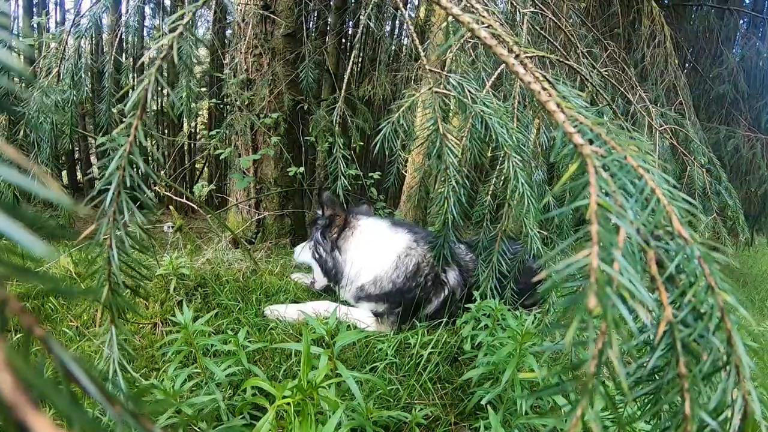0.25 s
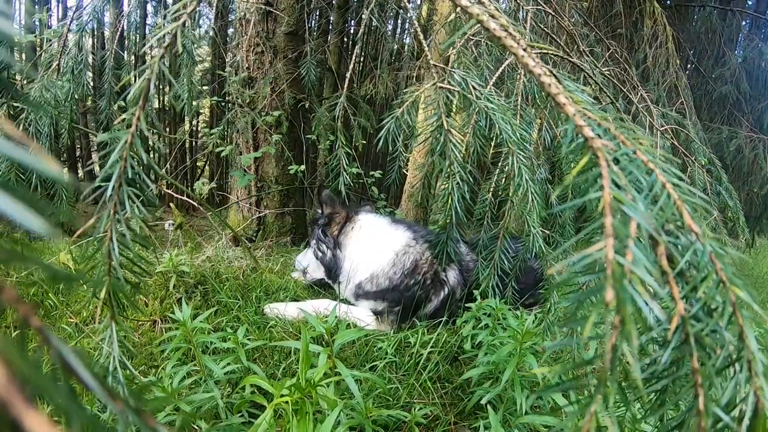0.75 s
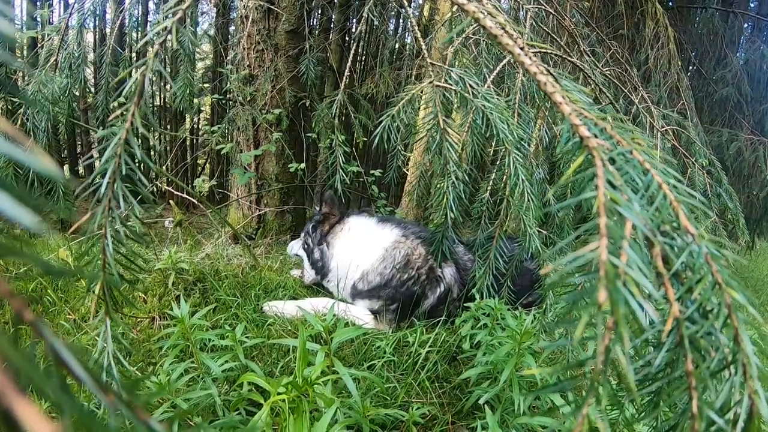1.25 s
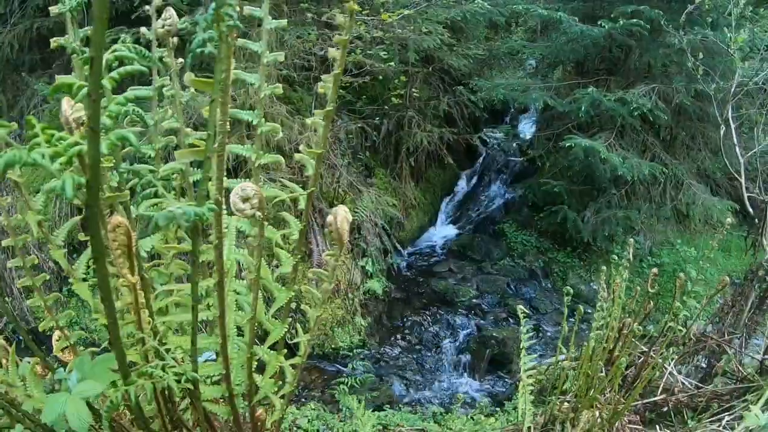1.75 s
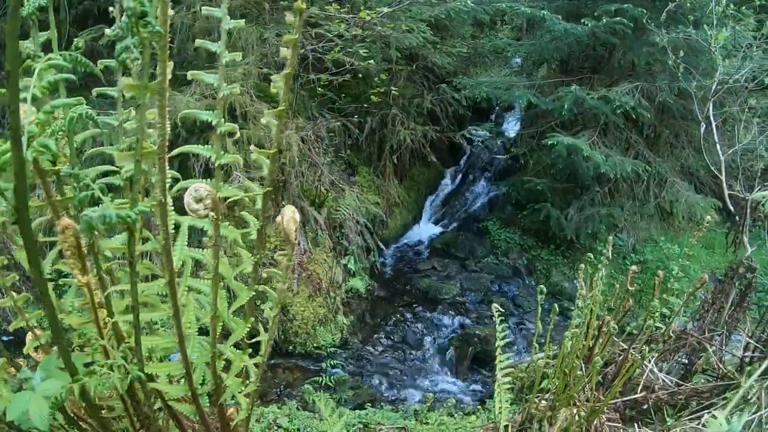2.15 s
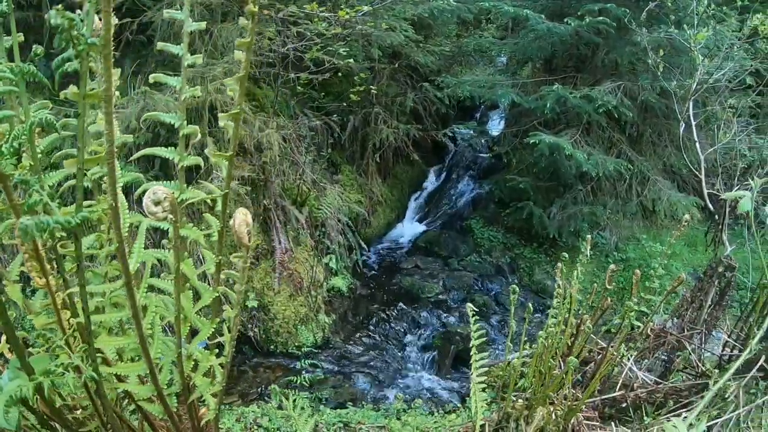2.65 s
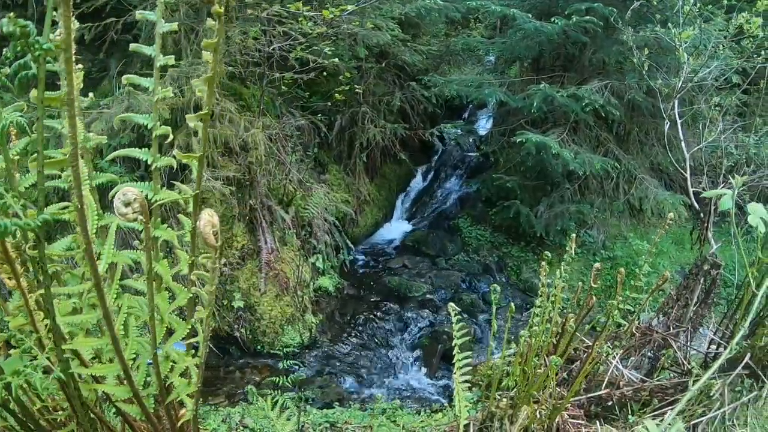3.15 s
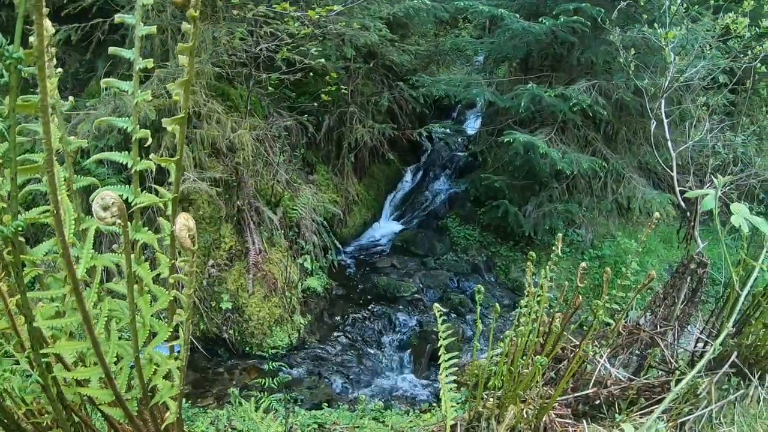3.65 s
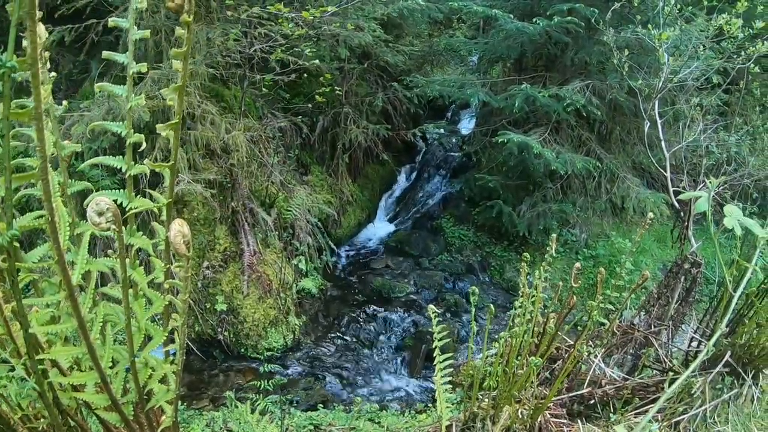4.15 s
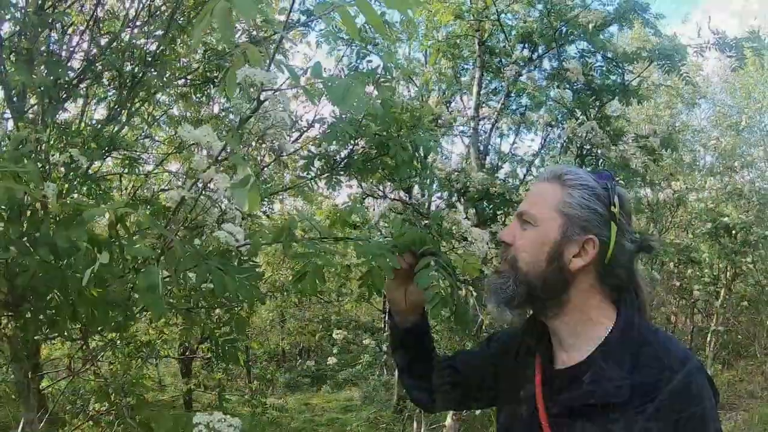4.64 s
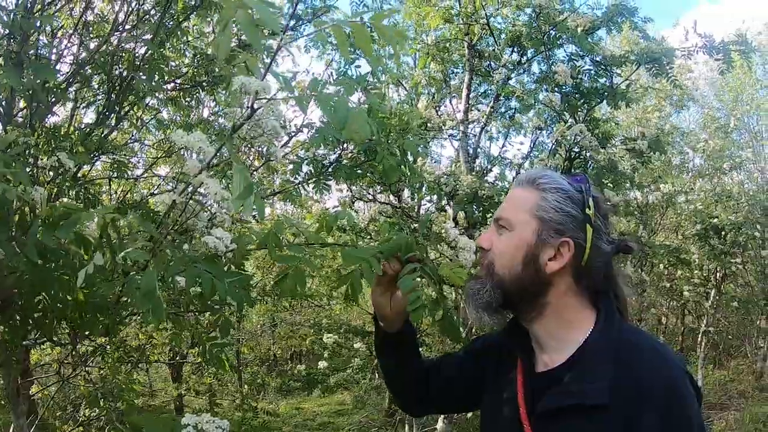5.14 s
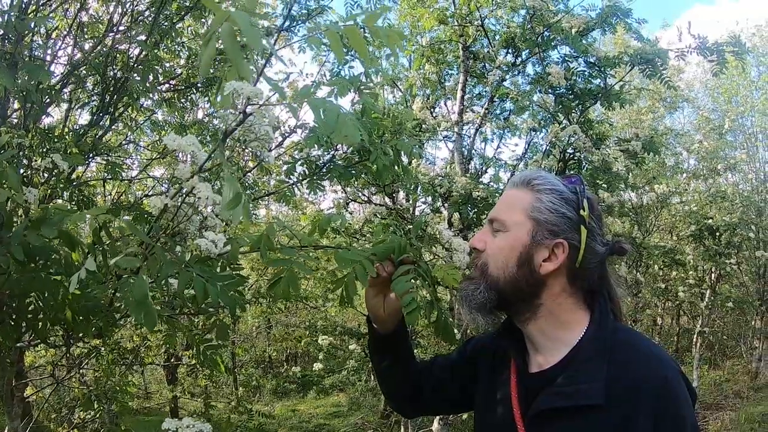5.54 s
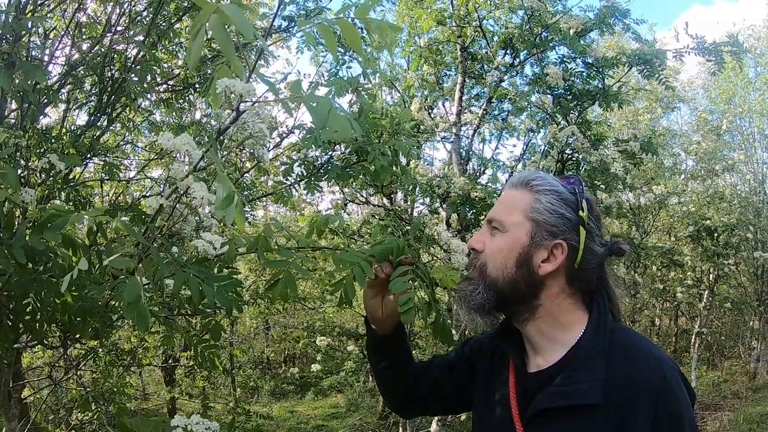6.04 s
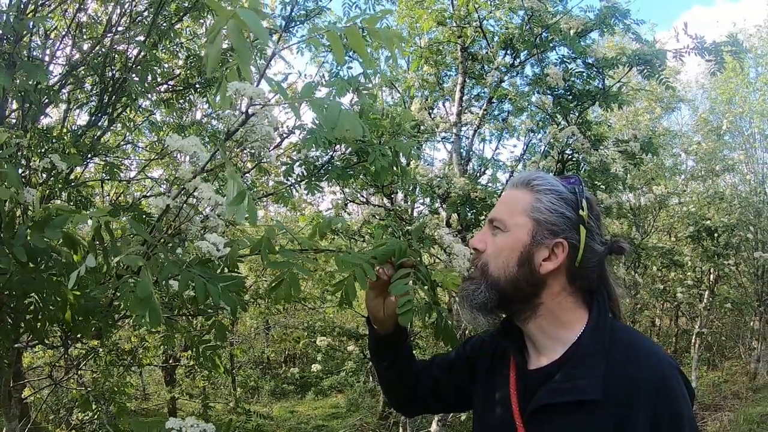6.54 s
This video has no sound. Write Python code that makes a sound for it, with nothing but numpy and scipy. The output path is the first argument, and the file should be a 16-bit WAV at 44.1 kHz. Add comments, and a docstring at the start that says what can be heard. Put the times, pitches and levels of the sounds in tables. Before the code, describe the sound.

Faint woodland hiss and a brief bird call, then a small waterfall splashing and bubbling nearby, giving way to softer birdsong.

```python
"""Three woodland places, cross-faded, on a small stereo microphone. First a quiet conifer glade: far
water hisses over a faint hum, twigs tick, and at 1.2 s a bird calls with two voices at once.
From 1.5 s we are close to a small waterfall: rush, spray and bubbles that ring as they burst, then
a brighter splash and wind on the microphone at 4.2 s. From 4.5 s the water gives way to a leafy
thicket, where birds whistle, chip, trill and rasp some way off and the trunks return their song."""
import sys
import numpy as np
from scipy import signal
from scipy.fft import rfft, irfft, next_fast_len
from scipy.io import wavfile
from scipy.ndimage import uniform_filter1d

SR = 44100
rng = np.random.default_rng(int(sys.argv[2]) if len(sys.argv) > 2 else 0)


def store_pcm(level_fs):
    """Save levels as 16-bit WAV."""
    pcm = np.round(np.clip(level_fs, -1, 1) * 32767).astype(np.int16)
    wavfile.write(sys.argv[1], SR, np.atleast_2d(pcm).T)


N = 299527

# ambience of the two quiet places: time_s, level_db
GLADE_LEVEL = [(0, -60.5), (.5, -59.5), (1.0, -60), (1.3, -58.5), (1.45, -61), (1.55, -80)]
THICKET_LEVEL = [(4.5, -59), (4.75, -56.5), (5.0, -56), (5.25, -57), (5.35, -54.5), (5.7, -54.5),
                 (6.1, -54), (6.4, -56.5), (6.79, -57)]
# leaves rustle brighter at the end: time_s, treble_db
LEAF_TREBLE = [(4.5, -1.5), (6.3, 0.5), (6.6, 4), (6.79, 4)]
# colour of each place: frequency_hz, relative_db
GLADE_SPECTRUM = [(12, -40), (25, -12), (100, -14), (175, -3.5), (300, -6.5), (480, -12), (700, -1.5),
                  (1000, -3.5), (1700, -3), (3000, -6.5), (5700, -17.5), (7500, -28.5), (9300, -27.5),
                  (11000, -44), (13000, -52)]
FALL_SPECTRUM = [(12, -60), (25, -50), (59, -11.5), (135, -1), (191, 2), (245, -7.5), (383, -2.5),
                 (435, -8), (540, -2), (680, -1.2), (790, -4), (1000, -2.5), (1250, -4), (2150, -9.5),
                 (3090, -7), (4000, -11), (16000, -14)]
THICKET_SPECTRUM = [(12, -48), (20, -12), (93, -20), (166, 1.5), (535, -8), (707, -4.5), (960, -12),
                    (1420, -10), (2340, -15), (3760, -12), (5550, -28.5), (10500, -40.5), (11800, -53),
                    (15600, -61)]
# how alike the two channels are: frequency_hz, correlation
GLADE_LIKENESS = [(60, 1), (150, 0.63), (380, -0.14), (950, 0.0095), (2380, 0.57), (5980, 0.17),
                  (15000, -0.27)]
FALL_LIKENESS = [(60, 0.96), (100, 0.99), (180, 0.99), (310, 0.97), (550, 1), (950, 0.64), (1650, 0.71),
                 (2860, 0.84), (4970, 0.98), (8640, 0.55), (15000, 1)]
THICKET_LIKENESS = [(60, 1), (6000, 1), (15000, 0.64)]
# stereo balance: frequency_hz, left_minus_right_db
GLADE_PAN = [(60, -2), (150, 1), (380, -1), (950, 3), (2380, 5), (5980, 0.5), (15000, 1.5)]
FALL_PAN = [(60, 0), (460, -.5), (610, -4), (820, -3.5), (1300, -1.5), (1960, 4), (2620, -4), (3510, -2),
            (4690, 1), (6270, -4.5), (8390, -7), (11200, -3.5), (15000, -1)]
THICKET_PAN = [(60, 0.0), (15000, 0.0)]
# the microphone ports colour the treble of the near water: frequency_hz, gain_db
PORT_COLOUR = [(4000, 0), (4500, -7), (5100, -3.5), (6300, -3.5), (6900, -8), (7500, -5), (8600, -6),
               (9600, -3.5), (10500, -10), (11300, -21), (14000, -23.5), (15000, -31), (15700, -40)]
# phase of the water between the ports: frequency_hz, left_lead_rad
PORT_LEAD = [(0, 0.15), (520, -0.38), (1120, 0.76), (1640, 0.44), (2330, -1.12), (3360, -0.17),
             (4820, -0.91), (5600, -1.16), (6550, 0.59), (7410, -1), (8440, -0.059), (15200, 0.2)]
# twig ticks, soft bumps and, last, a bird's short rasp:
# start_s, low_hz, high_hz, fall_30db_s, peak_db, left_minus_right_db
NOISE_BURSTS = [(0.421, 40, 130, .04, -60.5, 0.0), (0.589, 3300, 4100, .02, -55, 3.0),
                (1.042, 8600, 10600, .015, -69, 3.0), (1.141, 150, 3000, .04, -47, 3.0),
                (1.218, 3500, 6500, .03, -62, 3.0), (5.428, 6000, 11300, .04, -61, 0.0),
                (6.121, 1800, 4180, 0.12, -46, -2.5)]

# bird notes at the perch: start_s, length_s, start_hz, end_hz, haste, level_db
GLADE_CHIPS = [(1.185, .009, 6330, 3750, 1, -60), (1.191, .026, 3750, 4050, 1.6, -54),
               (1.196, .018, 5750, 6100, 3.0, -75), (1.223, 0.0094, 6200, 3720, 1.04, -61),
               (1.227, 0.013, 3260, 5150, 0.97, -55)]  # lead-in to the call
GLADE_VOICES = [(1.236, .228, 5150, 4380, .6, -57), (1.236, .2, 4230, 3480, .66, -56.5)]  # two sagging voices at once
THICKET_SONG = [(4.752, .06, 4600, 3850, 3.0, -59), (4.823, 0.024, 3160, 3220, 1.1, -58),
                (4.852, 0.05, 3620, 3490, 1.9, -53), (4.903, 0.053, 3160, 3520, 0.73, -56),
                (4.91, .02, 4200, 4300, 1.1, -69), (4.957, 0.046, 3100, 2880, 1.2, -64),
                (5.0, .04, 3700, 3680, 1.1, -62), (5.06, 0.074, 3030, 3530, .6, -59),
                (5.085, .02, 4000, 4050, 1.1, -63), (5.14, .11, 3720, 3820, 1.1, -66),
                (5.301, .025, 2250, 2650, 1.5, -60), (5.31, .065, 2600, 2800, 3.3, -49.5),
                (5.355, 0.082, 2640, 2190, 1.65, -51), (5.462, 0.057, 2360, 2120, .7, -54),
                (5.521, .08, 2140, 2070, 1.1, -61), (5.6, .17, 2134, 1970, 3.1, -62),
                (5.85, .04, 2355, 2280, 1.1, -66), (5.89, .1, 2230, 2130, 1.5, -59),
                (6.01, .03, 2110, 2240, 1.1, -63), (6.1, 0.039, 3100, 3500, .6, -52),
                (6.132, 0.031, 2790, 3220, 1, -52), (6.133, 0.022, 3580, 4000, 1.1, -53.5),
                (6.152, 0.02, 3950, 3230, 1.2, -53), (6.163, 0.036, 3230, 3420, 1.1, -56),
                (6.202, 0.19, 3370, 3620, 2.7, -56), (6.206, .03, 3950, 4320, 1.5, -59),
                (6.234, .05, 3930, 3790, 1.1, -55), (6.22, .25, 2100, 2180, 2.5, -58.5),
                (6.313, .07, 3750, 4540, 3.9, -60), (6.409, 0.041, 2950, 3400, 2.5, -53),
                (6.445, .022, 3300, 2600, 2.5, -55), (6.45, .165, 2650, 2400, 3.0, -51.5),
                (6.62, .08, 2370, 2370, 1.1, -65), (6.48, 0.065, 4440, 4540, 3.0, -62),
                (6.698, 0.027, 4900, 4000, 1.5, -64), (6.776, 0.02, 3550, 2690, 0.83, -60)]  # whistles
THICKET_TRILL = [(5.776, .026, 3480, 3350, 1.1, -51), (5.775, .035, 3850, 3780, 1.1, -61),
                 (5.82, .024, 3420, 3130, 1.1, -47), (5.868, .022, 3400, 3130, 1.1, -49),
                 (5.913, .03, 3225, 3350, 1.1, -48), (5.969, .036, 3200, 3450, 1.1, -46),
                 (6.012, .018, 3400, 3460, 1.1, -61), (6.036, .032, 3350, 3620, 1.1, -52)]  # a buzz of separate pulses
# in the thicket a second bird chips, a third gives thin falling notes: start_s, level_db
THICKET_CHIPS = [(5.063, -68), (5.39, -76), (5.708, -65), (6.038, -66), (6.372, -67)]
THICKET_SEEPS = [(5.325, -76), (5.47, -75), (5.625, -74)]
# their note shapes: length_s, start_hz, end_hz, haste
CHIP_SHAPE, SEEP_SHAPE = (.024, 6300, 5200, 2.5), (.09, 7500, 6600, 1.1)

# gusts on the microphone by the fall: start_s, length_s, level_db
WIND_GUSTS = [(4.197, .16, -43), (4.45, 0.11, -48)]
# near bubbles and drops that stand out of the rush: start_s, pitch_hz, level_db, ring_cycles
PLINKS = [(1.834, 3560, -27, 40), (1.86, 6600, -39, 50), (2.196, 840, -25, 27), (2.458, 3520, -29, 33),
          (2.519, 3100, -22, 46), (2.527, 9600, -21, 32), (2.543, 9000, -35, 15), (2.6, 8200, -29, 50),
          (3.085, 2070, -28, 40), (3.091, 9300, -28, 37), (3.139, 3060, -25, 110), (3.231, 2980, -23, 50),
          (3.256, 8500, -25, 45), (3.334, 1800, -30, 44), (3.46, 5100, -28, 54), (3.661, 9200, -21, 21),
          (3.765, 8850, -32, 40), (3.77, 2700, -30, 40), (4.162, 9750, -36, 40), (4.212, 10600, -33, 40)]

PAN_SPLIT = np.array([[.5], [-.5]])  # half of a left-right difference to each channel


def from_db(db):
    """Decibels to gain."""
    return 10 ** (np.asarray(db) / 20)


def unit_rms(x):
    """Scales to unit rms."""
    return x / np.sqrt(np.mean(x ** 2) + 1e-20)


def span_of(rows):
    """The samples and times that a curve covers."""
    at = np.arange(round(rows[0][0] * SR), min(N, round(rows[-1][0] * SR)))
    return at, at / SR


def along(rows, t):
    """The columns of a curve at times t."""
    times, *columns = np.transpose(rows)
    return [np.interp(t, times, column) for column in columns]


def at_hz(points, hz):
    """A spectrum read on a log-frequency axis."""
    freqs, values = np.transpose(points)
    return np.interp(np.log(hz), np.log(freqs), values)


def swell(t, start_s, rise_s, decay_s):
    """A straight rise to 1, then an exponential fall."""
    return np.clip((t - start_s) / rise_s, 0, 1) * np.exp(-np.maximum(t - start_s - rise_s, 0) / decay_s)


def drift(size, rate_hz):
    """Slow random wander of unit spread: coarse noise through a double one-pole low-pass."""
    pole = np.exp(-2 * np.pi * rate_hz * 40 / SR)
    slow = signal.lfilter([1], [1, -2 * pole, pole ** 2], rng.standard_normal(size // 40 + 2002))[2000:]
    return np.interp(np.arange(size) / 40, np.arange(len(slow)), unit_rms(slow))


def stereo_bed(source, spectrum, likeness, pan, shared_db, flicker_db, treble_db,
               ports=((1, 0), (2, 0)), lead=((0, 0), (1, 0))):
    """Colours mid and side noise; its third-octave bands swell together and flicker alone."""
    size = source.shape[1]
    freqs = np.maximum(np.fft.rfftfreq(size, 1 / SR), 1)
    alike = np.clip(at_hz(likeness, freqs), -1, 1)
    colour = from_db(at_hz(spectrum, freqs) + at_hz(ports, freqs))
    mid, side = rfft(source) * colour * np.sqrt([1 + alike, 1 - alike])
    stereo = np.array([mid + side, mid - side]) * from_db(at_hz(pan, freqs) * PAN_SPLIT)
    stereo *= np.exp(1j * PAN_SPLIT * np.interp(freqs, *np.transpose(lead)))
    out, together_db = 0, shared_db * drift(size, 8.1)
    for band in range(12, 43):
        window = np.clip(1 - abs(10 * np.log10(freqs) - band), 0, 1)  # triangles that sum to one
        treble_share = np.clip((band - 35) / 4, 0, 1)  # grows from 3 to 8 kHz
        band_db = together_db + flicker_db * drift(size, 15.4) + treble_share * treble_db
        out = out + irfft(stereo * window, size) * from_db(band_db)
    return out / np.sqrt(np.mean(out.mean(axis=0) ** 2))


def ambience(level, spectrum, likeness, pan, shared_db, flicker_db, treble=((0, 0), (1, 0))):
    """Far water and leaves merge into a smooth hiss."""
    out = np.zeros((2, N))
    at, t = span_of(level)
    noise = rng.standard_normal((2, next_fast_len(len(at))))
    treble_db = along(treble, t[0] + np.arange(noise.shape[1]) / SR)[0]
    hiss = stereo_bed(noise, spectrum, likeness, pan, shared_db, flicker_db, treble_db)
    out[:, at] = from_db(along(level, t)[0]) * hiss[:, :len(at)]
    return out


def glade_hum(pitch_hz=62, level_db=-80):
    """A faint low tone that wavers in level and fades with the glade."""
    out = np.zeros(N)
    at, t = span_of(GLADE_LEVEL)
    fade_db = along(GLADE_LEVEL, t)[0] - GLADE_LEVEL[0][1]
    gain = from_db(level_db + fade_db + 1.5 * drift(len(at), 4.8))
    out[at] = np.sqrt(2) * gain * np.sin(2 * np.pi * pitch_hz * t)
    return out


def noise_bursts():
    """Twig ticks, soft bumps and a bird's short rasp: each a quickly dying puff of noise in its band."""
    out = np.zeros((2, N))
    t = np.arange(SR // 5) / SR
    for start_s, low_hz, high_hz, fall_30db_s, peak_db, pan_db in NOISE_BURSTS:
        noise = rng.standard_normal(len(t)) * from_db(-30 * t / fall_30db_s) * np.clip(t / .0045, 0, 1)
        puff = signal.sosfilt(signal.butter(4, [low_hz, high_hz], "band", fs=SR, output="sos"), noise)
        i = round(start_s * SR)
        out[:, i:i + len(t)] += from_db(peak_db + pan_db * PAN_SPLIT) * puff / abs(puff).max()
    return out


def microphone_wind(t, start_db=-76, db_per_s=7.5):
    """Wind rumbles on the microphone, freshening and then gusting."""
    low_band = signal.butter(2, [20, 95], "band", fs=SR, output="sos")
    rumble = signal.sosfilt(low_band, rng.standard_normal((2, len(t))))
    breeze = from_db(start_db + db_per_s * (t - t[0]))
    gusts = sum(from_db(db) * swell(t, start_s, .035, length_s / 2) for start_s, length_s, db in WIND_GUSTS)
    return (breeze + gusts) * unit_rms(rumble + .15 * rumble[::-1])


def among_trees(call, t60_s, wet_db=-5):
    """Near leaves smear a call at once, far trunks return a longer tail, different in each channel."""
    t = np.arange(round(t60_s * SR)) / SR
    trunks = from_db(-60 * t / t60_s) * np.clip(t / .022, 0, 1)
    leaves = .48 * from_db(-60 * t / .1)
    tail = rng.standard_normal((2, len(t))) * (trunks + leaves)
    tail /= np.sqrt(np.sum(tail ** 2, axis=1, keepdims=True))
    return from_db(wet_db) * signal.fftconvolve(call[None], tail, axes=1)[:, :N]


def note(start_s, length_s, start_hz, end_hz, haste, level_db, attack_s=.03, release_s=.035):
    """One glide as time_s, pitch_hz, level_db; haste 1 glides evenly, more early, less late."""
    progress = np.linspace(0, 1, 40)
    rise, fall = min(attack_s / length_s, .5), min(release_s / length_s, .5)
    edge_db = -11 * (np.clip(1 - progress / rise, 0, 1) + np.clip(1 - (1 - progress) / fall, 0, 1))
    pitch_hz = end_hz + (start_hz - end_hz) * (1 - progress) ** haste
    return np.transpose([start_s + length_s * progress, pitch_hz, level_db + edge_db])


def whistle(rows, waver_hz, flutter):
    """A near sine, complex-valued; pitch trembles and level flutters on the way through leaves."""
    at, t = span_of(rows)
    pitch_hz, level_db = along(rows, t)
    knots = t[::60]
    tremble, flicker = [np.interp(t, knots, rng.standard_normal(800)[:len(knots)]) for _ in range(2)]
    phase = np.cumsum(2 * np.pi * (pitch_hz + waver_hz * tremble) / SR)
    gain = from_db(level_db + flutter * uniform_filter1d(flicker, size=300))
    edges = np.clip(np.minimum(t - t[0], t[-1] - t) / .0018, 0, 1)
    out = np.zeros(N, complex)
    out[at] = np.sqrt(2) * gain * edges * np.exp(1j * phase)
    return out


def far_twitter():
    """Birds deep in the thicket scatter faint, short glides."""
    out = np.zeros(N)
    for when, pitch, glide, size in rng.random((90, 4)):
        start_s, hz, level_db = 4.7 + 2 * when, 2900 + 1400 * pitch, -70 + 8 * size
        rows = [(start_s, hz, level_db), (start_s + .03, hz * (.9 + .198 * glide), level_db)]
        out += whistle(rows, waver_hz=100, flutter=0).real
    return out


def thicket_birds():
    """Whistles, chips, thin notes and a trill from some way off, near centre, over far twitter."""
    chips = [(start_s, *CHIP_SHAPE, db) for start_s, db in THICKET_CHIPS]
    seeps = [(start_s, *SEEP_SHAPE, db) for start_s, db in THICKET_SEEPS]
    song = sum(whistle(note(*row), waver_hz=85, flutter=6) for row in THICKET_SONG + chips + seeps).real
    song += sum(whistle(note(*row), waver_hz=110, flutter=3.5) for row in THICKET_TRILL).real
    twitter = far_twitter()
    direct = from_db(-1.6) * song + .44 * twitter
    left, right = among_trees(song + twitter, t60_s=.55)
    return direct + np.array([left + .021 * right, left - .023 * right])  # a nearly mono tail


def glade_bird():
    """Left of centre: chips, then two voices that mix in the throat into faint extra tones."""
    chips = sum(whistle(note(*row), waver_hz=140, flutter=9) for row in GLADE_CHIPS)
    upper, lower = [whistle(note(*row, attack_s=.004, release_s=.115), waver_hz=70, flutter=6.5)
                    for row in GLADE_VOICES]
    sum_tone, overtone = 16 * upper * lower, 9 * lower ** 2
    combination_tone = from_db(77) * upper ** 2 * lower.conj()  # twice the upper pitch minus the lower
    call = (chips + upper + lower + sum_tone + overtone + combination_tone).real
    return call * from_db([[.8], [-3.5]]) + among_trees(call, t60_s=.3)


def bubbles(size, per_s, spread_db, ring_cycles):
    """Bursting bubbles ring briefly, their pitches spread from gurgle to fizz."""
    strength = from_db(spread_db * np.minimum(rng.exponential(1, (2, size)), 5))
    strength *= rng.choice([-1, 1], (2, size))
    bursts = strength * (rng.random((2, size)) < per_s / SR)
    pitch_index, out = rng.integers(0, 36, (2, size)), 0
    for k, hz in enumerate(np.geomspace(250, 14000, 36)):
        pole, angle = from_db(-60 * hz / (ring_cycles * SR)), 2 * np.pi * hz / SR
        kicks = bursts * (pitch_index == k) + 1e-18
        out += hz * signal.lfilter([0, np.sin(angle)], [1, -2 * pole * np.cos(angle), pole ** 2], kicks)
    return unit_rms(out)


def plinks():
    """Each near bubble rings down while its pitch climbs a little as it nears the surface."""
    out = np.zeros(N)
    for start_s, pitch_hz, level_db, ring_cycles in PLINKS:
        cycles = np.arange(SR // 20) * pitch_hz / SR
        envelope = np.clip(cycles / 3, 0, 1) * from_db(level_db - 60 * cycles / ring_cycles)
        i = round(start_s * SR)
        out[i:i + len(cycles)] += envelope * np.sin(2 * np.pi * cycles * (1 + .001 * cycles))
    return out * from_db([[-1.5], [1.5]])


def spray_treble_db(t, splash_s=4.195, decay_s=.052):
    """The spray brightens slowly, flares in one splash and is duller after it."""
    rising_db = -2.8 + .8 * (t - t[0])
    splash_db = 7 * swell(t, splash_s, .02, decay_s)
    dulling_db = 2.2 * np.clip((t - splash_s) / (2 * decay_s), 0, 1)
    return rising_db + splash_db - dulling_db


def waterfall(start_s=1.458, end_s=4.752, fade_in_s=.42, fade_out_s=.59, level_db=-31.6):
    """A small fall at close range: a dense rush of noise and bubbles, with wind on the microphone."""
    out = np.zeros((2, N))
    at, t = span_of([(start_s,), (end_s,)])
    size = next_fast_len(len(at))
    water = rng.standard_normal((2, size))
    water += from_db(-6.5) * bubbles(size, per_s=2500, spread_db=3.2, ring_cycles=25.7)
    rush = stereo_bed(water, FALL_SPECTRUM, FALL_LIKENESS, FALL_PAN, shared_db=.13, flicker_db=.87,
                      treble_db=spray_treble_db(t[0] + np.arange(size) / SR),
                      ports=PORT_COLOUR, lead=PORT_LEAD)
    pan_db = -1.16 + .68 * (t - t[0])  # the microphone turns slowly: the water moves left
    rush = from_db(level_db + pan_db * PAN_SPLIT) * rush[:, :len(at)]
    fade = np.clip(np.minimum((t - t[0]) / fade_in_s, (t[-1] - t) / fade_out_s), 0, 1)
    out[:, at] = np.sin(np.pi / 2 * fade) * (rush + microphone_wind(t))
    return out


def scene():
    """Glade, waterfall and thicket in turn."""
    glade = ambience(GLADE_LEVEL, GLADE_SPECTRUM, GLADE_LIKENESS, GLADE_PAN, shared_db=-.05, flicker_db=2)
    glade += glade_hum()
    thicket = ambience(THICKET_LEVEL, THICKET_SPECTRUM, THICKET_LIKENESS, THICKET_PAN,
                       shared_db=.5, flicker_db=.3, treble=LEAF_TREBLE)
    return glade + glade_bird() + waterfall() + plinks() + thicket + thicket_birds() + noise_bursts()


def record(dry, cutoff_hz=15720):
    """A steep low-pass cuts the top of the band."""
    return signal.sosfilt(signal.ellip(12, .5, 60, cutoff_hz, fs=SR, output="sos"), dry)


dry = scene()
out = record(dry)
store_pcm(out)
```